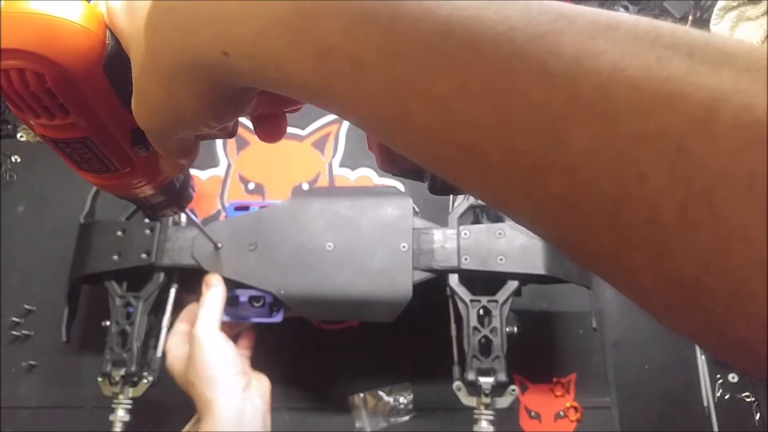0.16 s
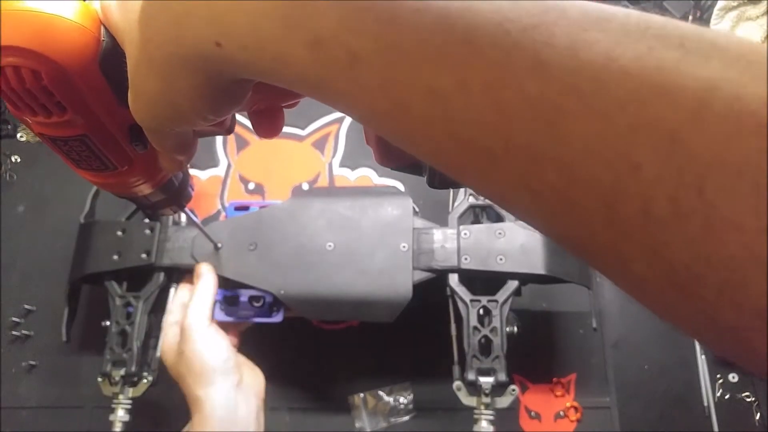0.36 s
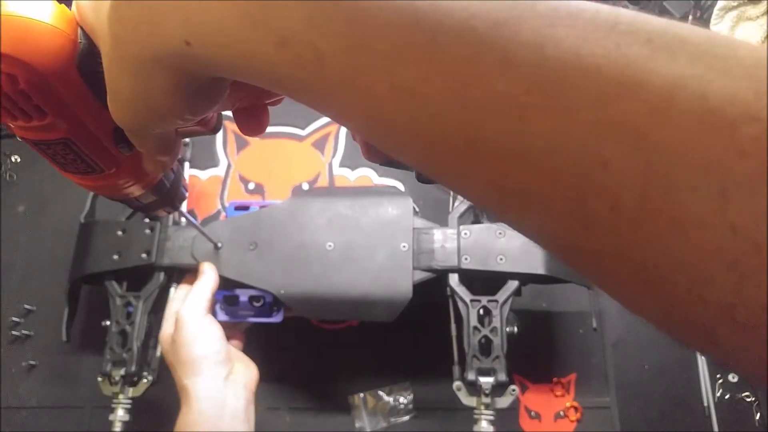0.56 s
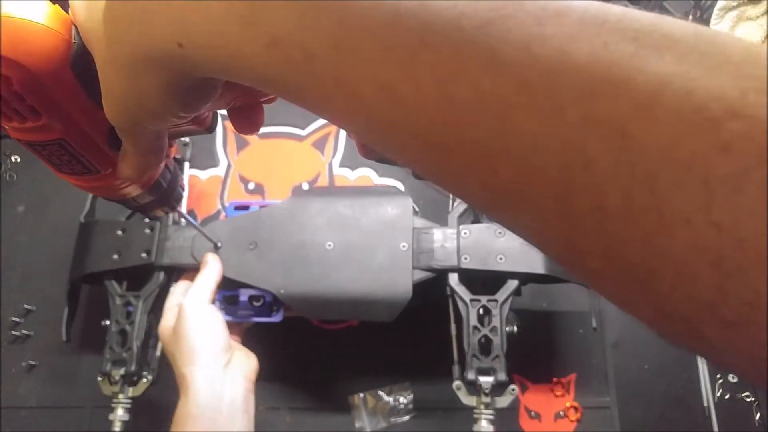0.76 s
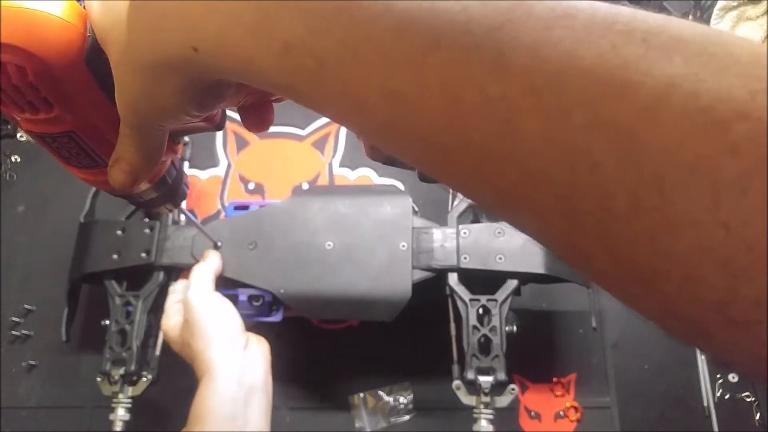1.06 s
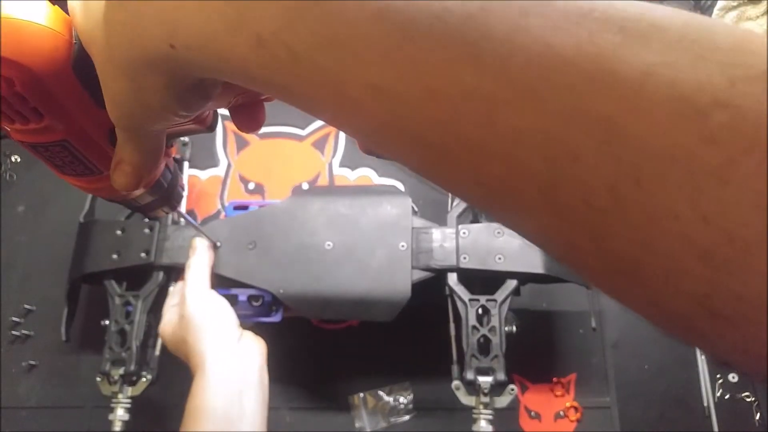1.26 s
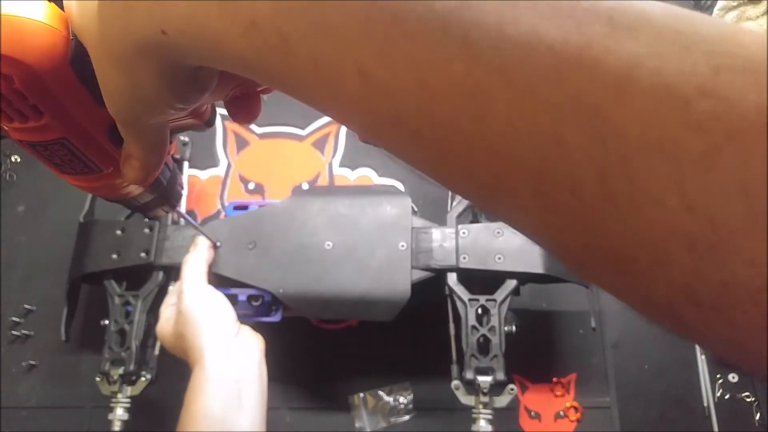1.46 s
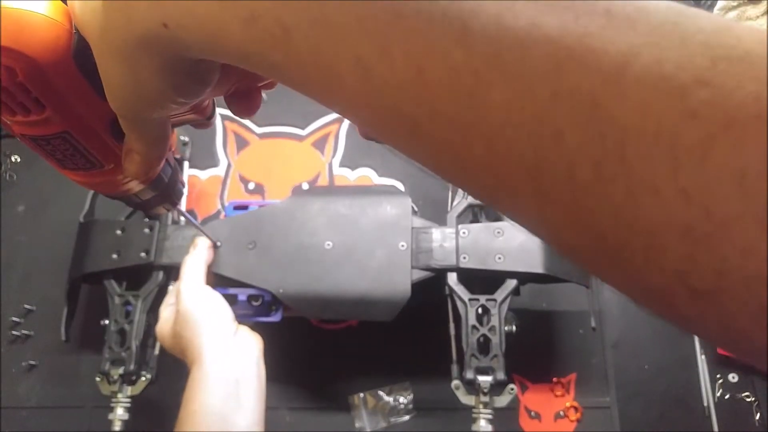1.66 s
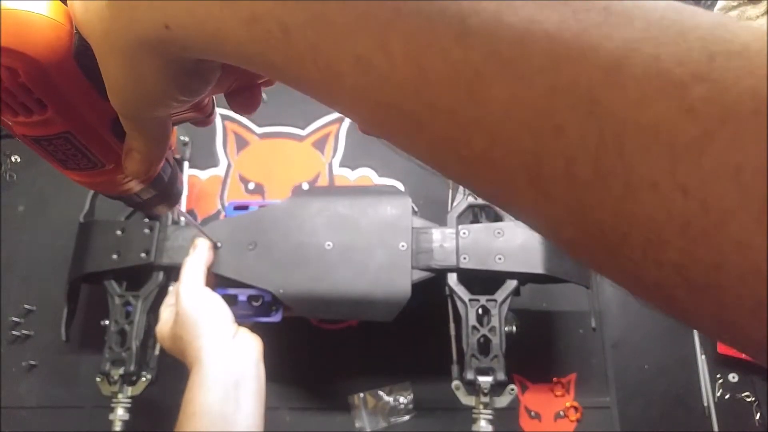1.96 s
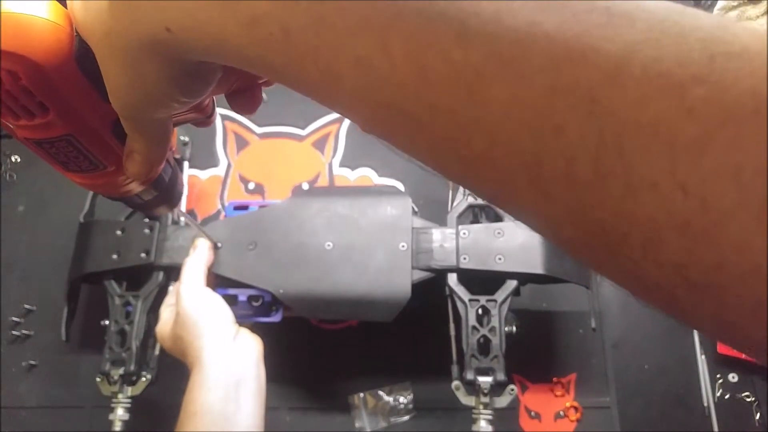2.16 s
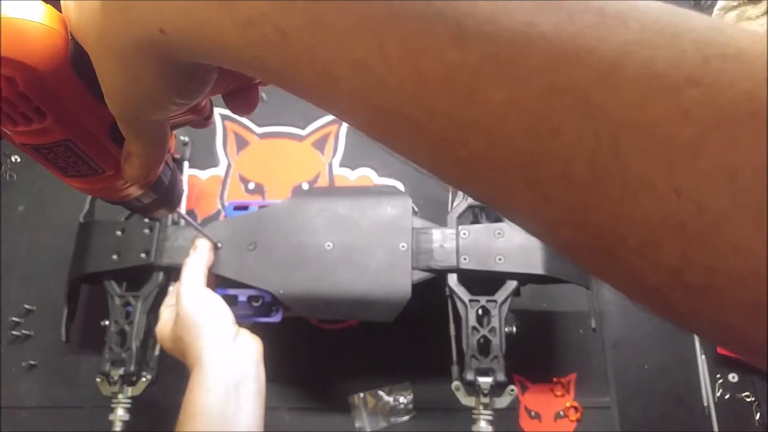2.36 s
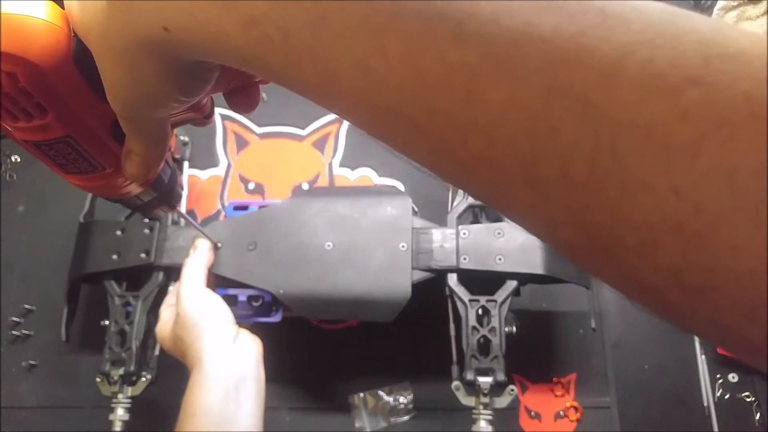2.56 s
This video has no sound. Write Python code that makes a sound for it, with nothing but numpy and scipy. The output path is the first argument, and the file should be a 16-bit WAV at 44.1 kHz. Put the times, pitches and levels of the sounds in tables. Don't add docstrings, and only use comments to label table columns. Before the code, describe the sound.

A cordless drill gives one short whining burst, stopping with a clunk, over quiet fan hum.

```python
import sys
import numpy as np
from scipy import signal
from scipy.fft import rfft, irfft
from scipy.io import wavfile
from scipy.ndimage import uniform_filter1d

SR = 44100
rng = np.random.default_rng(int(sys.argv[2]) if len(sys.argv) > 2 else 0)


def unload_audio(sound):
    columns = np.transpose(np.atleast_2d(sound))
    steps = np.round(np.clip(columns, -1, 1) * 32767)
    wavfile.write(sys.argv[1], SR, steps.astype(np.int16))


def convert_level_to_amplitude(level_db):
    exponent = np.asarray(level_db, float) / 20
    return 10 ** exponent


N = 119070
T = np.arange(N) / SR
HZ = np.maximum(np.fft.rfftfreq(N, 1 / SR), 1)
RELEASE_S = 2.306

# (frequency [Hz], shared part [0-1])
AIR_COHERENCE = [(60, 0.96), (130, 0.89), (290, 0.94), (640, 0.74), (1410, 0.094), (3100, 0.6),
                 (6820, 0.15), (15000, 0.49)]
# (frequency [Hz], left over right [dB])
AIR_BALANCE = [(60, -0.5), (130, 0.5), (290, -1.0), (640, -2.5), (1410, -0.5), (3100, -3), (6820, 0),
               (15000, -4)]
# (frequency [Hz], shared part [0-1])
DRILL_COHERENCE = [(60, 0.78), (180, 0.72), (550, 0.9), (1650, 0.85), (4970, 0.02), (15000, 0.02)]
# (frequency [Hz], left over right [dB])
DRILL_BALANCE = [(300, -3), (800, 4.5), (1500, -2), (3000, -2.5), (6000, -0.5), (9200, -9), (11500, -4.5),
                 (14000, -0.5)]


def rms_one(x):
    return x / np.sqrt(np.mean(x ** 2) + 1e-20)


def at_hz(points):
    hz, value = np.transpose(points)
    return np.interp(np.log(HZ), np.log(hz), value)


def drift(rate_hz):
    return rms_one(irfft(rfft(rng.standard_normal(N)) / (1 + (HZ / rate_hz) ** 2), N))


def spread(pair, coherence, balance):
    mid, side = rfft(pair)
    shared = np.clip(at_hz(coherence), 0, 1)
    half_db = at_hz(balance) / 2
    common, different = np.sqrt(1 + shared) * mid, np.sqrt(1 - shared) * side
    left = convert_level_to_amplitude(half_db) * (common + different)
    right = convert_level_to_amplitude(-half_db) * (common - different)
    return np.array([left, right]) / np.sqrt(2)


def coloured(spectrum, coherence, balance):
    hz = np.array(spectrum)[:, 0]
    inside = (HZ >= hz[0]) & (HZ < hz[-1])
    stereo = spread(rng.standard_normal((2, N)), coherence, balance)
    return rms_one(irfft(stereo * convert_level_to_amplitude(at_hz(spectrum)) * inside, N))


def resonance(x, hz, width_hz):
    r = np.exp(-np.pi * width_hz / SR)
    b = [(1 - r * r) / 2, 0, (r * r - 1) / 2]
    a = [1, -2 * r * np.cos(2 * np.pi * hz / SR), r * r]
    return signal.lfilter(b, a, x + 1e-18)


def decay(start_s, t60_s):
    return (T >= start_s) * convert_level_to_amplitude(-60 * np.maximum(T - start_s, 0) / t60_s)


def effort_db():
    # (time [s], level [dB])
    effort = [
        (1.752, -69),
        (1.78, -52.5),
        (1.83, -42),
        (1.95, -37.5),
        (2.1, -39.5),
        (2.3, -39.5),
        (2.39, -47),
        (2.46, -61),
        (2.55, -87),
    ]
    s, db = np.transpose(effort)
    outside_s = np.maximum(s[0] - T, 0) + np.maximum(T - s[-1], 0)
    return np.interp(T, s, db) - 400 * outside_s


def whine():
    # (time [s], tooth rate [Hz], whine level [dB])
    spin = [(1.822, 648, -29), (1.854, 757, -18.5), (1.885, 803.2, -27), (1.946, 866.2, -25.5),
            (1.965, 873.3, -28.5), (2.05, 850, -31.5), (2.084, 835.5, -35.5), (2.136, 824, -32),
            (2.166, 807, -24), (2.23, 769.3, -24.5), (2.3, 731.5, -21.5), (2.33, 663, -17.5),
            (2.356, 604, -26), (2.401, 454, -34.5)]
    # (time [s], depth [dB])
    slips = [
        (1.899, 12),
        (1.934, 15),
        (2.082, 2),
        (2.132, -1),
        (2.316, 13),
    ]
    s, hz, db = np.transpose(spin)
    late, early = np.maximum(T - s[-1], 0), np.maximum(s[0] - T, 0)
    speed = np.interp(T, s, hz) - 3200 * late - 7000 * early
    speed = uniform_filter1d(np.maximum(speed, 50), size=600)
    turn = 2 * np.pi * np.cumsum(speed) / SR
    level_db = np.interp(T, s, db) - 346 * late - 1500 * early
    level_db = level_db - 9.5 * np.clip((T - RELEASE_S) / 0.0063, 0, 1)
    level_db = level_db + 1.5 * drift(11.5)
    slip_width_s = 0.0072
    slip_db = sum(depth_db * np.exp(-((T - at_s) / slip_width_s) ** 2) for at_s, depth_db in slips)
    tone = np.sin(turn) * convert_level_to_amplitude(level_db - slip_db)
    return np.sqrt(2) * (tone + overtones(speed, turn, late) + coast_whirr(speed, turn, late))


def overtones(speed, turn, late):
    # (multiple, level driven [dB], level coasting [dB], casing ring [Hz], its width [Hz])
    partials = [(.525, -54, -72, 440, 200), (1.31, -51, -46, 1130, 27), (1.49, -41, -55, 1200, 36),
                (2, -44, -55, 1665, 44), (2.5, -53.5, -56, 2060, 50), (2.99, -50, -55, 2590, 47),
                (4.2, -57.5, -58, 3380, 90), (4.5, -49.5, -55, 3300, 130), (5.24, -47, -62, 4550, 90),
                (5.95, -48.5, -62, 4650, 74), (10.6, -52.5, -70, 9150, 280)]
    coasting = np.clip((T - RELEASE_S) / 0.025, 0, 1)
    effort = effort_db()
    out = np.zeros(N)
    for k, driven_db, coast_db, ring_hz, width_hz in partials:
        lift = 1 / np.sqrt(1 + ((k * speed - ring_hz) / width_hz) ** 2)
        level_db = driven_db + (coast_db - driven_db) * coasting + effort - effort.max()
        level_db = level_db - 150 * late + 3 * drift(13)
        out += lift * np.sin(k * turn + rng.uniform(0, 2 * np.pi)) * convert_level_to_amplitude(level_db)
    return out


def coast_whirr(speed, turn, late):
    multiple = 2.85
    freed = T - RELEASE_S + 0.025
    fade_in = np.clip(freed / .06, 0, 1)
    lift = .6 + .8 / (1 + ((multiple * speed - 1760) / 130) ** 2)
    level_db = -33.5 - 40 * freed - 500 * np.maximum(late - .05, 0) + 2 * drift(25)
    return np.sin(multiple * turn + .9 * drift(40)) * fade_in * lift * convert_level_to_amplitude(level_db)


def rattle():
    # (frequency [Hz], width [Hz], level [dB])
    casing = [(730, 100, -44), (1086, 59, -39.5), (1221, 22, -34), (1420, 220, -52), (1677, 39, -48.5),
              (1860, 81, -49), (1972, 24, -56.5), (2595, 91, -54.5), (3380, 230, -50), (4570, 97, -50.5),
              (9060, 190, -56.5), (11400, 400, -62), (12500, 600, -62)]
    # (time [s], level [dB])
    load = [
        (1.764, -19),
        (1.78, -5.5),
        (1.82, -1),
        (1.9, -3),
        (1.99, -6),
        (2.09, -1.5),
        (2.27, 2),
        (2.34, 2),
        (2.44, 1),
        (2.55, -20),
    ]
    knocks_per_s, knock_spread_db = 3300, 1.5
    effort = effort_db()
    body = convert_level_to_amplitude(np.interp(T, *np.transpose(load), left=-99) - 510 * np.maximum(T - load[-1][0], 0))
    top = convert_level_to_amplitude(0.42 * (effort - effort.max())) * (T > load[0][0])
    out = np.zeros((2, N))
    for hz, width_hz, db in casing:
        struck = rng.random((2, N)) < knocks_per_s / SR
        force = convert_level_to_amplitude(knock_spread_db * np.minimum(rng.exponential(1, (2, N)), 4))
        knocks = struck * force * rng.choice([-1, 1], (2, N))
        ring = resonance(knocks, hz, width_hz)
        ring = ring / (uniform_filter1d(ring ** 2, size=400) + 1e-12) ** (0.27 / 2)
        gain = body if hz < 2200 else top
        out += convert_level_to_amplitude(db + 2.06 * drift(24)) * gain * rms_one(ring)
    return irfft(spread(out, DRILL_COHERENCE, DRILL_BALANCE), N)


def hiss():
    # (frequency [Hz], density [dB per Hz])
    spectrum = [(530, -39), (900, -4.5), (1000, -3), (1250, -45), (1340, -12), (1700, -17), (2220, -19.5),
                (12400, -19), (16000, -26)]
    noise = coloured(spectrum, DRILL_COHERENCE, DRILL_BALANCE)
    treble = irfft(rfft(noise) * (HZ > 3000), N)
    return noise / np.std(treble) * convert_level_to_amplitude(effort_db() + 0.72 * drift(22))


def switch():
    # (multiple, level [dB])
    harmonics = [(1, -54), (2, -74), (3, -72)]
    chop_hz, on_s, rise_s = 3796, 1.755, 0.01
    since = T - on_s
    first_pull = convert_level_to_amplitude(-500 * np.maximum(since - .03, 0))
    hold = convert_level_to_amplitude(-3 + 2.2 * drift(14) - 8 * since)
    shape = np.clip(since / rise_s, 0, 1) * (first_pull + hold) * (T < RELEASE_S)
    return np.sqrt(2) * shape * sum(convert_level_to_amplitude(db) * np.sin(2 * np.pi * k * chop_hz * T) for k, db in harmonics)


def clunk():
    # (frequency [Hz], level [dB], t60 [s])
    mode_table = [(750, 1.5, 0.036), (1415, -6.5, 0.026), (1920, -9.5, 0.012), (2500, -17, .01),
                  (3330, -16, 0.014), (5800, -16, .012), (6800, -26, .01)]
    lock_s = 2.399
    swell = 1 - np.exp(-np.maximum(T - lock_s, 0) / 0.0014)
    modes = np.zeros(N)
    for hz, db, t60_s in mode_table:
        mode = convert_level_to_amplitude(db) * np.sin(2 * np.pi * hz * (T - lock_s)) * decay(lock_s, t60_s)
        modes += mode * (swell if hz < 1600 else 1)
    crack = rng.standard_normal(N) * decay(lock_s, 0.091)
    blow = convert_level_to_amplitude(-14.5) * modes + convert_level_to_amplitude(-30.5) * (resonance(crack, 4390, 2190) + 0.24 * crack)
    return signal.sosfilt(signal.butter(4, 520, "high", fs=SR, output="sos"), blow)


def ticks():
    # (time [s], peak level [dB], low edge [Hz], t60
    # [s], screw ring [dB])
    contacts = [(.112, -58.5, 8900, 1, -20), (.178, -62, 3000, .03, -20), (.237, -51, 3480, 0.08, -12),
                (.413, -52, 2020, 0.09, -8), (.448, -64, 10000, .02, 4), (0.45, -50.5, 4500, 0.027, 11),
                (0.4532, -52, 7000, 0.02, 9), (0.4567, -55, 7000, .03, 6), (.462, -60, 6500, .3, 4),
                (.473, -61.5, 6500, .2, 2), (.830, -62.5, 6000, .07, 1), (.87, -63, 6000, .06, -2),
                (1.0, -49.5, 2500, .05, -20), (1.245, -60.5, 8500, 0.73, -22), (1.27, -47, 3000, .025, -17)]
    # (frequency [Hz], width [Hz], level [dB])
    screw = [(7800, 500, 14.5), (12500, 840, 8), (14200, 800, 9)]
    out = np.zeros((2, N))
    for s, db, low_hz, t60_s, ring_db in contacts:
        noise = rng.standard_normal((2, N)) * decay(s, t60_s)
        ring = sum(convert_level_to_amplitude(mode_db + ring_db) * resonance(noise, hz, width_hz) for hz, width_hz, mode_db in screw)
        band = signal.butter(2, [low_hz, min(2.9 * low_hz, 19000)], "band", fs=SR, output="sos")
        out += convert_level_to_amplitude(db) * (signal.sosfilt(band, noise) + ring)
    thud_s, thud_hz = .8203, 850
    thud = -convert_level_to_amplitude(-36) * np.sin(2 * np.pi * thud_hz * (T - thud_s)) * decay(thud_s, 0.018)
    return irfft(spread(out, AIR_COHERENCE, AIR_BALANCE), N) + thud


def room(x):
    tail = rng.standard_normal((2, N)) * decay(0.0073, 0.28)
    tail = tail / np.sqrt(np.sum(tail ** 2, axis=1, keepdims=True))
    return convert_level_to_amplitude(-8.5) * signal.fftconvolve(x * np.ones((2, 1)), tail, axes=1)[:, :N]


def fan():
    # (frequency [Hz], density [dB per Hz])
    low = [(15, -42), (25, -2.5), (92, -18.5), (162, -10.5), (193, -12.5), (230, -1), (254, -5.5),
           (335, -1.5), (500, -16), (650, -69), (1100, -120)]
    # (frequency [Hz], density [dB per Hz])
    high = [(290, -53), (500, -12), (637, -6), (847, 1), (963, -8.5), (1180, -7.5), (1340, -10.5),
            (2470, -19.5), (15100, -41.5)]
    # (frequency [Hz], level [dB], wander [dB])
    hum = [(58.8, -69, 3.5), (226.5, -57, 1.4), (234, -59.5, 0.53), (282, -63, 0.44), (330.2, -66, 2.4),
           (1147, -53, 0.41)]
    air = convert_level_to_amplitude(-51.5) * coloured(low, AIR_COHERENCE, AIR_BALANCE)
    air = air + convert_level_to_amplitude(-46) * coloured(high, AIR_COHERENCE, AIR_BALANCE)
    air = air - 0.98 * resonance(air, 496, 81) + .5 * resonance(air, 2720, 390)
    air = air - .5 * resonance(air, 221.5, 25)
    in_step_s = .892
    tones = np.zeros(N)
    for hz, db, wander_db in hum:
        phase = 2 * np.pi * hz * (T - in_step_s) + 0.12 * drift(3.2)
        tones += convert_level_to_amplitude(db + wander_db * drift(4.3)) * np.cos(phase)
    return air + np.sqrt(2) * tones * convert_level_to_amplitude([[-.5], [.5]])


def scene():
    tone = whine() * convert_level_to_amplitude([[.5], [-.5]])
    drill = switch() * convert_level_to_amplitude([[-1.5], [1.5]]) + clunk() * convert_level_to_amplitude([[-.3], [.3]]) + rattle() + hiss()
    return tone + drill + room(drill + convert_level_to_amplitude(-8) * tone) + ticks() + fan()


def roll_off(x):
    return signal.sosfilt(signal.butter(12, 16150, fs=SR, output="sos"), x)


def record(dry):
    # (frequency [Hz], gain [dB])
    microphone = [(31, -20), (39, 1), (8200, -0.5), (8750, -5), (9150, 1.5), (13000, 0), (15800, -1.5),
                  (15950, -40)]
    mix = irfft(rfft(dry) * convert_level_to_amplitude(at_hz(microphone)), N) - .0008
    return roll_off(mix)


dry = scene()
out = record(dry)
unload_audio(out)
```